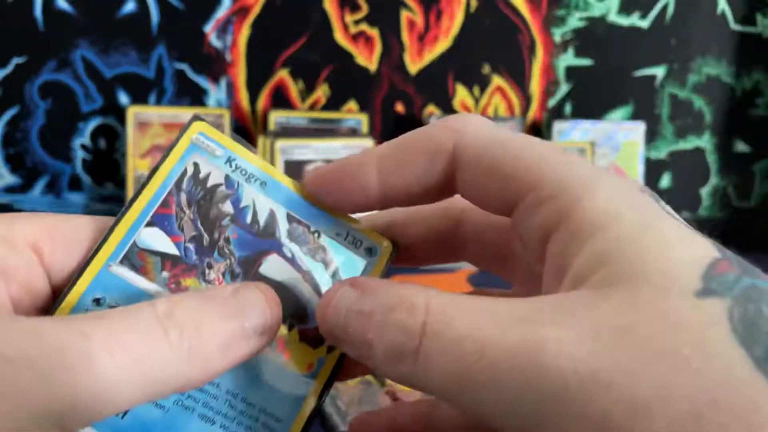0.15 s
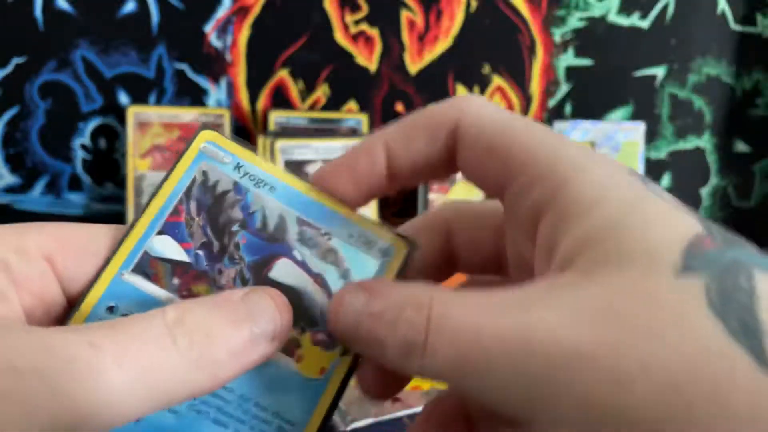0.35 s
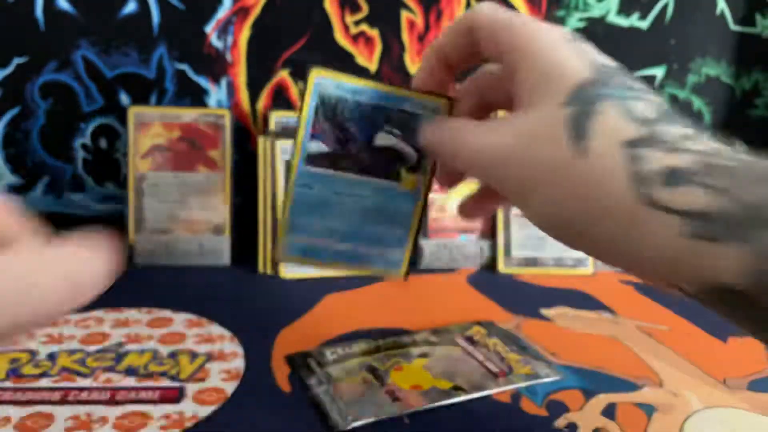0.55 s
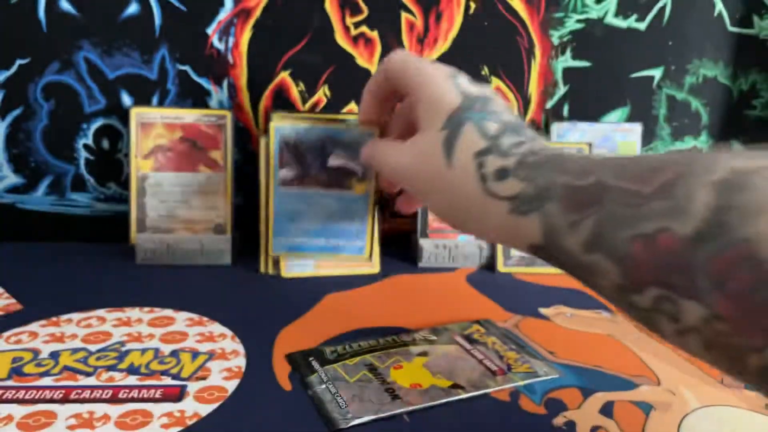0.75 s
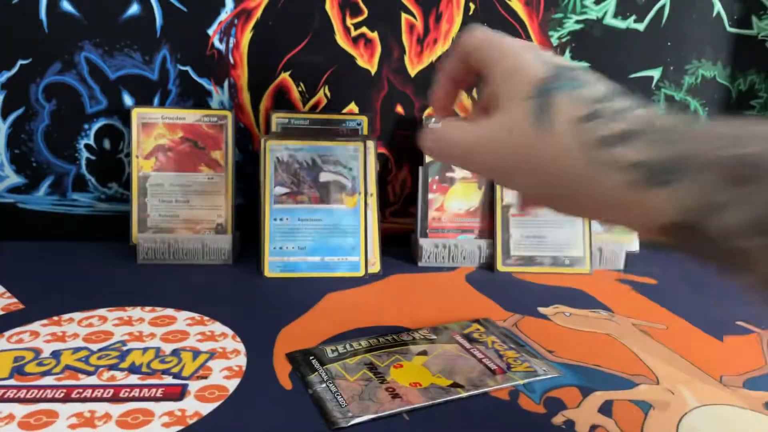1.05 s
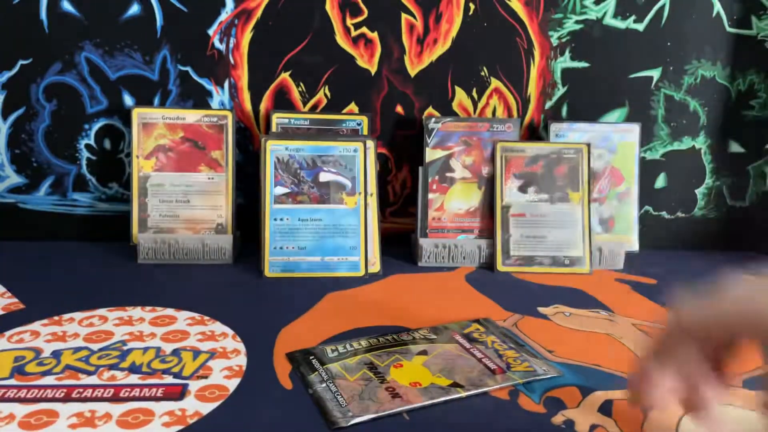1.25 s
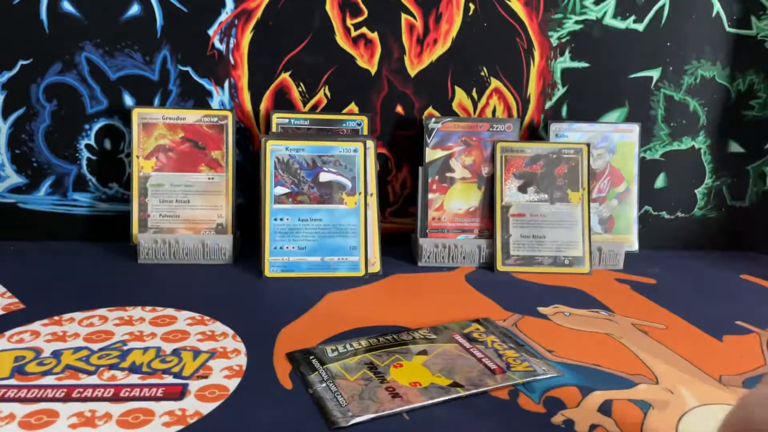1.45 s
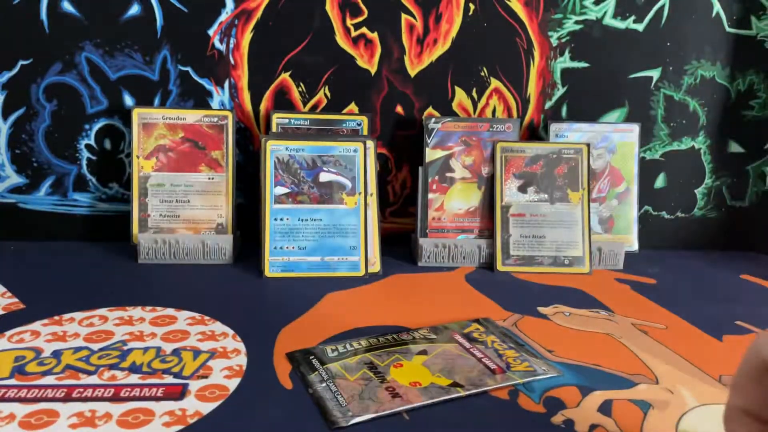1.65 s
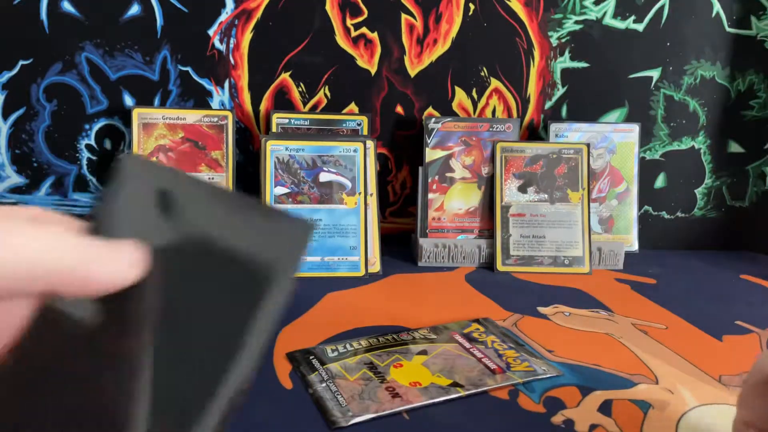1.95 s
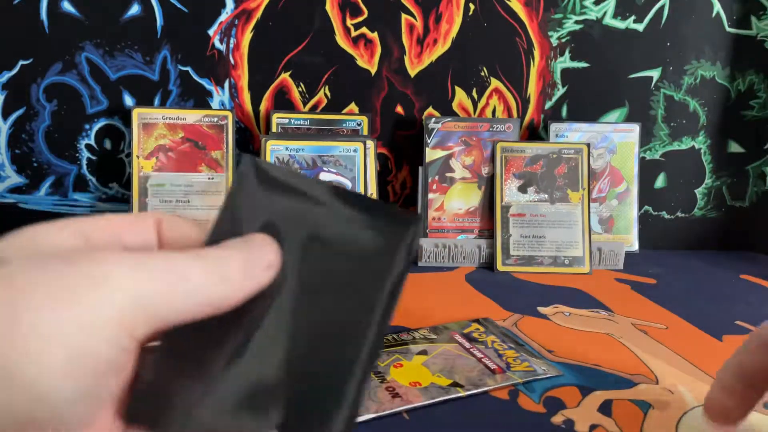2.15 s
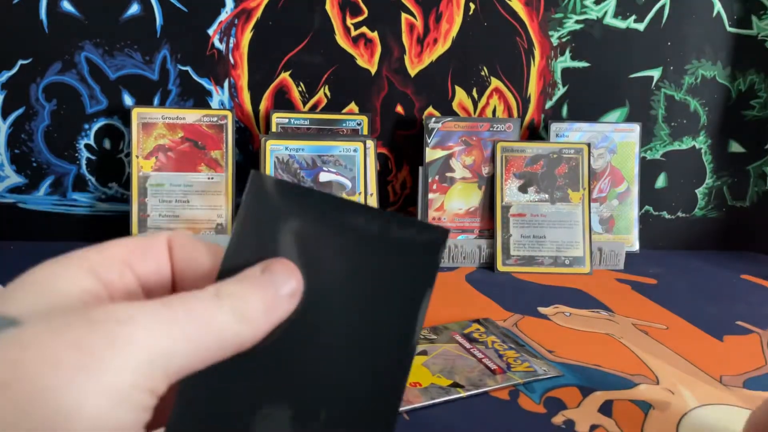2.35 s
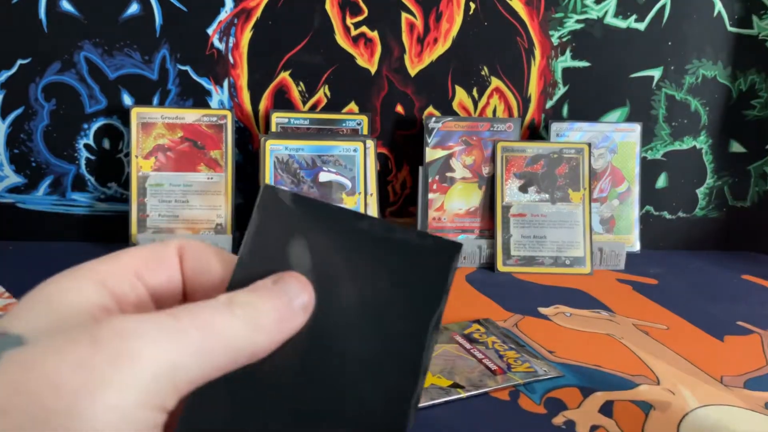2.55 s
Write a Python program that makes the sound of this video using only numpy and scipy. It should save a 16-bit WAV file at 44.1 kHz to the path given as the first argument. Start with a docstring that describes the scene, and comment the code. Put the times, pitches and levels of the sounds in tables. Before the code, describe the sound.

Close handling of cards: a brief rustle with ticks, dull knocks and dragging on a wooden table, stronger rustle and snaps, then one loud plastic click and sparse faint movements, indoors with little echo.

```python
"""Hands slide trading cards and plastic sleeves over a light wooden table, close to a phone with two ports.
First a low table ring, then at 0.3 s a gust of rustle (flickering noise bands) with ticks (click bursts).
Knocks (ringing modes and a thud) and drag (noise-driven modes) at 0.6-0.8 s; rustle and snaps at 1.1-1.2 s.
A faint whistle (gliding narrow noise) comes and goes from 0.84 s, and a deep drag swells near 1.5 s.
The sharpest snap comes with a knock at 1.98 s; sparse small sounds follow over a quiet, steady room noise."""
import sys
import numpy as np
from scipy import signal
from scipy.fft import rfft, irfft
from scipy.io import wavfile
from scipy.ndimage import uniform_filter1d

SR = 44100
rng = np.random.default_rng(int(sys.argv[2]) if len(sys.argv) > 2 else 0)


def dump_mix(stems):
    """Bounce the given channels to the path in sys.argv[1] as a 16-bit WAV at rate SR."""
    frames = np.atleast_2d(stems).T  # one column per channel
    limited = np.clip(frames, -1, 1)  # hard clip at full scale
    pcm = np.round(limited * 32767).astype(np.int16)
    wavfile.write(sys.argv[1], SR, pcm)


N = 119070


def amp(db):
    """Amplitude ratio of a level in dB."""
    return 10 ** (np.asarray(db) / 20)


def unit(x):
    """Scale to an RMS of 1."""
    return x / np.sqrt(np.mean(x ** 2))


def curve(table, column):
    """A table column interpolated over time; column 0 is time_s."""
    rows = np.array(table)
    return np.interp(np.arange(N) / SR, rows[:, 0], rows[:, column])


def over_hz(table, size):
    """A (freq_hz, value) table interpolated over log frequency at every FFT bin."""
    rows = np.array(table)
    bins_hz = np.arange(size // 2 + 1) * SR / size
    return np.interp(np.log(bins_hz + 1), np.log(rows[:, 0]), rows[:, 1])


def colour(x, table):
    """Shape a spectrum by a table, silent outside its range, at unit RMS."""
    hz = np.arange(N // 2 + 1) * SR / N
    inside = (hz > table[0][0]) & (hz < table[-1][0])
    return unit(irfft(rfft(x) * amp(over_hz(table, N)) * inside, N))


def ring(x, hz, t60_s):
    """One decaying mode: a two-pole resonator driven by x."""
    radius = np.exp(-np.log(1000) / (t60_s * SR))
    w = 2 * np.pi * hz / SR
    return signal.lfilter([np.sin(w)], [1, -2 * radius * np.cos(w), radius * radius], x)


def band(x, hz, width_hz):
    """One pass of a resonant band filter."""
    b, a = signal.iirpeak(hz, hz / width_hz, fs=SR)
    return signal.lfilter(b, a, x)


def walk(rate_hz):
    """Unit-RMS random levels held 1 / rate_hz s and slewed twice."""
    hold = int(SR / rate_hz)
    steps = np.repeat(rng.standard_normal(N // hold + 1), hold)
    return unit(uniform_filter1d(uniform_filter1d(steps, hold), hold)[:N])


def pair(make, unlike):
    """Two channels: a common signal plus one of opposite sign, of amplitude unlike."""
    common = np.sqrt(1 - unlike ** 2) * make()
    return common + unlike * make() * np.array([[1], [-1]])


def add(out, x, start_s, pan_db):
    """Mix a mono event into both channels; pan_db is left over right."""
    i = int(start_s * SR)
    x = x[:N - i]
    out[:, i:i + len(x)] += x * amp(np.array([[pan_db], [-pan_db]]) / 2)


GRAINS_PER_S, GRAIN_DB, GRAIN_SPREAD_DB = 700, -9, 2.6


def grainy():
    """Hiss with tiny creases of film: sparse random ticks."""
    ticks = (rng.random(N) < GRAINS_PER_S / SR) * amp(GRAIN_SPREAD_DB * rng.exponential(size=N))
    return rng.standard_normal(N) + amp(GRAIN_DB) * unit(ticks * rng.standard_normal(N))


FLICKER_DB, FLICKER_RATE_HZ = 4, 14


def patchy(x):
    """Overlapping third-octave bands of a stereo noise, each flickering on its own."""
    spectrum = rfft(x)
    octave = np.log2(np.arange(N // 2 + 1) * SR / N + 1)
    out = 0
    for k in range(25, 43):  # about 320 Hz to 16 kHz
        weight = np.clip(1 - 3 * np.abs(octave - k / 3), 0, 1)
        out = out + irfft(spectrum * weight, N) * amp(FLICKER_DB * walk(FLICKER_RATE_HZ))
    return out


# rustle of film, card and skin: time_s, mid_level_db, low_level_db, treble_level_db (before flicker)
RUSTLE = [(0, -68.5, -75.5, -76), (.1, -85.5, -89.5, -85), (.235, -91, -91, -98.5), (.25, -76, -74, -78),
          (.33, -60.5, -68.5, -64), (.4, -69, -73, -71.5), (.425, -78.5, -81, -82.5),
          (.53, -75, -87.5, -75.5), (.64, -72.5, -70, -76), (.69, -60.5, -63, -69.5),
          (.82, -66.5, -58.5, -74), (.86, -78, -73.5, -89), (.92, -74.5, -77, -77.5),
          (.95, -66.5, -66.5, -68.5), (1.05, -70.5, -85.5, -73.5), (1.08, -55, -59, -70.5),
          (1.16, -61, -64, -64), (1.18, -63, -71, -73), (1.23, -48, -46.5, -54.5), (1.27, -64.5, -66, -73),
          (1.45, -59, -62.5, -66.5), (1.57, -63.5, -69.5, -65.5), (1.7, -57, -63, -60.5),
          (1.91, -59, -59, -66.5), (1.96, -59.5, -59, -73), (2.05, -61.5, -69, -81),
          (2.15, -84.5, -72.5, -108), (2.26, -86.5, -79.5, -86.5), (2.29, -72.5, -82, -76),
          (2.46, -66, -65, -70.5), (2.52, -80.5, -76, -86), (2.7, -75.5, -87, -78)]
# spectra of the three rustle bands: freq_hz, relative_db
RUSTLE_LOW_SHAPE = [(450, -1), (650, -4), (800, -4), (1200, -2.5), (1600, -0.5), (2200, -5.5)]
RUSTLE_MID_SHAPE = [(2000, -8), (2500, -1), (3000, -6), (4000, -3.5), (5000, -3), (6500, -5), (8000, -11)]
RUSTLE_TREBLE_SHAPE = [(7800, -9), (9000, 2.5), (10500, 1.5), (12000, -1), (13300, -5), (14200, -24)]
UNLIKE = 0.649  # amplitude of the opposite-sign part
STUTTER_DB, STUTTER_RATE_HZ = 2.2, 70


def rustle():
    """Sliding film, card and skin: grainy noise in three broad bands, flickering and stuttering."""
    out = 0
    for column, shape in enumerate((RUSTLE_MID_SHAPE, RUSTLE_LOW_SHAPE, RUSTLE_TREBLE_SHAPE), 1):
        noise = pair(lambda: colour(grainy(), shape), UNLIKE)
        out = out + noise * amp(curve(RUSTLE, column))
    return patchy(out) * amp(STUTTER_DB * walk(STUTTER_RATE_HZ))


# scrapes in one band each: start_s, length_s, centre_hz, width_hz (per filter pass), level_db (before flicker)
SCRAPES = [(0.232, 0.102, 5250, 2640, -66), (0.27, 0.0176, 10500, 1800, -60.5),
           (0.65, 0.1595, 3120, 900, -64), (1.103, 0.049, 2422, 503, -54), (1.341, 0.056, 2290, 936, -63.5),
           (1.663, 0.077, 2446, 400, -67), (2.27, 0.2772, 5650, 2215, -79),
           (2.333, 0.063, 11000, 2500, -68.5), (1.113, 0.033, 5310, 1590, -55)]
SCRAPE_EDGE_S, SCRAPE_FLICKER_DB, SCRAPE_FLICKER_RATE_HZ = 0.01544, 2.5, 60


def scrapes():
    """Short rubs: grainy noise through a twice-applied resonant band, ramped in and decaying out."""
    out = np.zeros((2, N))
    rub = pair(grainy, UNLIKE)
    flicker = amp(SCRAPE_FLICKER_DB * walk(SCRAPE_FLICKER_RATE_HZ))
    for start_s, length_s, centre_hz, width_hz, level_db in SCRAPES:
        stop_s = start_s + length_s + 4 * SCRAPE_EDGE_S
        span = slice(int(start_s * SR), min(int(stop_s * SR), N))
        t = np.arange(span.stop - span.start) / SR
        fade = np.exp(-np.maximum(t - length_s, 0) / SCRAPE_EDGE_S)
        envelope = np.minimum(t / SCRAPE_EDGE_S, 1) * fade
        noise = unit(band(band(rub[:, span], centre_hz, width_hz), centre_hz, width_hz))
        out[:, span] += noise * envelope * flicker[span] * amp(level_db)
    return out


# snaps and ticks of plastic: burst_peak_s, peak_db (before the ports), centre_hz, length_s, tilt_db_per_octave
SNAPS = [(0.32, -32, 9800, 0.0027, 14), (0.334, -35, 1920, 0.0039, -26.5),
         (0.3467, -33.5, 1144, 0.001024, -22), (0.3474, -26.5, 11370, 0.000908, 5.5),
         (0.3504, -35, 9400, 0.00436, 4), (0.359, -34.5, 10600, 0.009, 15.5),
         (.369, -37, 9900, 0.0021, 1.5), (0.4678, -47.5, 9200, 0.0043, -0.5),
         (0.753, -37.5, 1090, 0.00299, -5), (0.794, -35, 1510, 0.00263, -14),
         (0.805, -53.5, 1430, 0.008, -15.5), (0.944, -44, 1400, 0.00172, -6.5),
         (1.0388, -40, 1250, 0.00183, 6), (1.0651, -32.5, 2790, 0.001, 4), (1.068, -25, 2510, 0.003, -4.5),
         (1.2146, -28, 4850, 0.00366, -3.5), (1.221, -25, 2570, 0.0022, -3.5),
         (1.2265, -31.5, 1620, 0.00449, -1), (1.396, -40.5, 2050, 0.0065, 3.5),
         (1.508, -34, 3970, 0.0163, 3), (1.522, -38, 743, 0.00646, -2), (1.921, -26, 2150, 0.0023, 7),
         (1.9787, -23, 6400, 0.002, -3.5), (1.9816, -11, 2116, 0.00147, -1), (1.99, -27, 4130, 0.0027, 9.5),
         (2.007, -33, 4030, 0.00325, -1), (2.197, -58, 1500, 0.0024, -25), (2.459, -45.5, 793, 0.0043, 9),
         (2.645, -54.5, 5500, 0.002, -3)]
# resonances of the plastic: freq_hz, half_width_hz, relative_db
PLASTIC = [(912.6, 127, 10), (2020, 600, -10.5), (3425, 200, 6.5), (4127, 350, 9.5), (5084, 43, 6),
           (6412, 160, 2), (8110, 330, -3.5)]
SNAP_CLICK_DB, SNAP_BODY_DB, SNAP_CRACK_DB = -2, -3.5, -12
SNAP_TAIL_DB, SNAP_TAIL_S = -34.5, 0.00542
SNAP_RELATIVE_WIDTH, SNAP_TOP_HZ = .28, 13270


def snaps():
    """Plastic lets go: a noise burst and one click ring a band and the plastic's modes, with a hissy tail."""
    out, t = np.zeros((2, N)), np.arange(4096) / SR
    for burst_peak_s, peak_db, centre_hz, length_s, tilt_db in SNAPS:
        chance = rng.standard_normal((3, len(t)))
        envelope = (t / length_s) ** 2 * np.exp(-4 * t / length_s)
        burst = chance[0] * np.abs(chance[1]) * envelope
        burst[int(length_s / 2 * SR)] = amp(SNAP_CLICK_DB) * np.sqrt(np.sum(burst ** 2))
        tail = chance[2] * np.exp(-t / SNAP_TAIL_S) * np.minimum(t / length_s, 1)
        burst = burst + amp(SNAP_TAIL_DB) * tail
        body = 0
        for hz, half_width_hz, mode_db in PLASTIC:
            tilted_db = mode_db + tilt_db * np.log2(hz / centre_hz)
            body = body + amp(tilted_db) * band(burst, hz, 2 * half_width_hz)
        crack = np.diff(burst, prepend=0) * amp(tilt_db) / np.std(np.diff(burst))
        x = unit(band(burst, centre_hz, SNAP_RELATIVE_WIDTH * centre_hz))
        x = x + amp(SNAP_BODY_DB) * unit(body) + amp(SNAP_CRACK_DB) * crack
        x = signal.sosfilt(signal.butter(6, SNAP_TOP_HZ, fs=SR, output="sos"), x)
        add(out, x / np.abs(x).max() * amp(peak_db), burst_peak_s - length_s / 2, 0)
    return out


# faint breathy whistle in the friction: time_s, pitch_hz, level_db
WHISTLE = [(.84, 1180, -77), (.91, 1310, -59.5), (.98, 1400, -65), (1.02, 1420, -93.5), (1.25, 1450, -66.5),
           (1.345, 1460, -55), (1.38, 1460, -84), (1.57, 1420, -73), (1.64, 1480, -72.5), (1.87, 1554, -64),
           (2.0, 1600, -61), (2.3, 1620, -87)]
WHISTLE_WALK_RATE_HZ = 240


def whistle():
    """Friction whistle: slow complex noise on a gliding carrier, only within its table's span."""
    t = np.arange(N) / SR
    carrier = np.exp(2j * np.pi * np.cumsum(curve(WHISTLE, 1)) / SR)

    def make():
        breath = walk(WHISTLE_WALK_RATE_HZ) + 1j * walk(WHISTLE_WALK_RATE_HZ)
        return unit(np.real(breath * carrier))

    inside = (t > WHISTLE[0][0]) & (t < WHISTLE[-1][0])
    return pair(make, UNLIKE) * amp(curve(WHISTLE, 2)) * inside


# phase gap with the hands left, then right, of the phone: freq_hz, left_lead_rad
PHASE_LEFT = [(20, 5), (430, 1.26), (700, 4.5), (2000, 4.5), (2850, 10.5), (4300, 10), (6400, 18),
              (9000, 16.5), (12900, 9), (16000, 11.5)]
PHASE_RIGHT = [(20, 5.5), (1460, 0.323), (2240, -2.5), (4050, 0), (6300, -7), (8000, -8), (10500, -13),
               (13000, -15), (16000, -20)]
CROSS_S, LEFT_PAN_DB, RIGHT_PAN_DB = 1.57, 2.5, 1.35  # pans are left over right


def ports(x):
    """Two ports hear the hands with a frequency-dependent phase gap that changes as they cross sides."""
    on_left = np.clip((CROSS_S - np.arange(N) / SR) * 20 + .5, 0, 1)  # 50 ms crossfade
    out = 0
    for share, phase, pan_db in ((on_left, PHASE_LEFT, LEFT_PAN_DB), (1 - on_left, PHASE_RIGHT, RIGHT_PAN_DB)):
        port = np.exp(.5j * over_hz(phase, N)) * amp(pan_db / 2)
        out = out + irfft(rfft(x * share) * np.array([port, 1 / port]), N)
    return out


# knocks on the table: start_s, peak_db (before pan), upper_modes_relative_db, thud_hz, thud_hold_s
KNOCKS = [(0.114, -48.5, -41, 115.3, 0.012), (0.337, -47, -8, 96.4, 0.0552),
          (0.347, -37, -5.5, 312.5, 0.00534), (0.559, -45, -26.5, 124.5, 0.0156),
          (0.579, -42, -14.5, 93.6, 0.0334), (0.661, -45.5, -8, 141.8, 0.0402),
          (0.692, -48, -12, 81.1, 0.0465), (0.794, -31, -21, 314.8, 0.0156), (0.808, -29.5, -1, 128, 0.013),
          (0.94, -45, -9.5, 120.8, 0.0275), (0.992, -46.5, -9.5, 104, 0.0228),
          (1.084, -45, -14.5, 208.7, 0.0103), (1.157, -47, -32, 140.5, 0.0175),
          (1.227, -34, -8, 137, 0.00874), (1.263, -40.5, -44, 139.5, 0.0375),
          (1.287, -36.5, -20.5, 50.32, 0.0503), (1.492, -45, -19.5, 139.8, 0.0244),
          (1.517, -48.5, -9.5, 132.1, 0.03), (1.772, -45.5, -6, 241.3, 0.00676),
          (1.925, -36, -3, 113, 0.0145), (1.987, -28.5, -7, 213.7, 0.00445),
          (1.997, -35.5, -31, 141.9, 0.0438), (2.02, -44.5, -37.5, 54.86, 0.052),
          (2.102, -46, -8.5, 309, 0.0073), (2.199, -45, -34, 135.3, 0.0432),
          (2.251, -45, -36, 55.23, 0.0535), (2.431, -54.5, -19.5, 59.7, 0.039),
          (2.454, -52.5, -5, 142.3, 0.0207), (2.547, -51.5, -10.5, 139.7, 0.0656)]
# modes of the table top: freq_hz, relative_db, t60_s
TABLE_MODES = [(47.5, 0, 0.53), (89.9, 1.5, 0.31), (140.9, 1.5, 0.31), (230.25, -2, 0.0646),
               (294.8, -2, 0.0797), (362, -0.5, 0.061), (433.85, -3.5, 0.094), (596.5, -11, 0.046),
               (894.6, -21, 0.055)]
UPPER_HZ, UPPER_DB = 190, 14.5  # start of the upper modes; gain added to their level
LOW_PUSH_S, UPPER_PUSH_S, MODE_SPREAD_DB = 0.00473, 0.001853, 2.0
THUD_DB, THUD_RISE_CYCLES, THUD_FADE_CYCLES = 3.5, 0.53, 0.788
TABLE_PAN_DB = 1.5


def knocks():
    """Impacts ring the table modes under a thud that swells, holds and dies; hard ones excite upper modes."""
    out, t = np.zeros((2, N)), np.arange(16384) / SR
    # repeated pulses would need a modulo: each push rises and falls once
    low_push = np.sin(np.pi * np.minimum(t / LOW_PUSH_S, 1)) ** 2
    upper_push = np.sin(np.pi * np.minimum(t / UPPER_PUSH_S, 1)) ** 2
    for start_s, peak_db, hard_db, thud_hz, hold_s in KNOCKS:
        spot_db = MODE_SPREAD_DB * rng.standard_normal(len(TABLE_MODES))  # where the top is struck
        low, high = 0, 0
        for (hz, mode_db, t60_s), spot in zip(TABLE_MODES, spot_db):
            if hz < UPPER_HZ:
                low = low + amp(mode_db + spot) * ring(low_push, hz, t60_s)
            else:
                high = high + amp(mode_db + spot) * ring(upper_push, hz, t60_s)
        modes = low / np.abs(low).max() + amp(hard_db + UPPER_DB) * high / np.abs(high).max()
        rise = np.minimum(t * thud_hz / THUD_RISE_CYCLES, 1)
        fade = np.exp(-np.maximum(t - hold_s, 0) * thud_hz / THUD_FADE_CYCLES)
        x = modes + amp(THUD_DB) * rise * fade * np.sin(2 * np.pi * thud_hz * t)
        add(out, x / np.abs(x).max() * amp(peak_db), start_s, TABLE_PAN_DB)
    return out


# arms and cards dragging: time_s, low_modes_db, deepest_mode_db, upper_modes_db (all before DRAG_DB)
DRAG = [(0.0, -71.5, -55, -74), (0.39, -107, -89, -88), (0.62, -54, -87, -71), (0.74, -55, -81, -63.5),
        (0.8, -73.5, -59.5, -59), (1.01, -66.5, -58.5, -69), (1.2, -64, -55.5, -69.5),
        (1.38, -61, -63, -67), (1.47, -71.5, -46, -66.5), (1.6, -75, -58, -75), (1.8, -68.5, -91.5, -73),
        (1.94, -70.5, -73, -65.5), (2.04, -81.5, -72.5, -59.5), (2.13, -92.5, -57, -80.5),
        (2.28, -73, -56, -77), (2.4, -68.5, -67, -65), (2.7, -71.5, -76.5, -79)]
DRAG_DB, DRAG_JUDDER_DB, DRAG_JUDDER_RATE_HZ, DRAG_UNLIKE = -3, 4.5, 16, 0.418


def drag():
    """Arms and cards rub the top: noise drives each table mode, with a juddering level."""
    out = 0
    for hz, mode_db, t60_s in TABLE_MODES:
        if hz < 70:
            level_db = curve(DRAG, 2)
        else:
            level_db = mode_db + curve(DRAG, 1 if hz < UPPER_HZ else 3)
        judder_db = DRAG_JUDDER_DB * walk(DRAG_JUDDER_RATE_HZ)
        noise = pair(lambda: unit(ring(rng.standard_normal(N), hz, t60_s)), DRAG_UNLIKE)
        out = out + noise * amp(level_db + DRAG_DB + judder_db)
    return out


TABLE_LAG_S = 0.000315


def table_ports(x):
    """Table sound reaches the right port late before CROSS_S and early after it."""
    n = np.arange(N)
    lag = np.where(n / SR < CROSS_S, 1, -1) * int(TABLE_LAG_S * SR)
    return np.array([x[0], x[1][np.clip(n - lag, 0, N - 1)]])


ECHO_T60_S, ECHO_DB, ECHO_GAP_S = 0.2295, -17, .004


def echo(near):
    """Room reflections: convolution with exponentially decaying noise after a short gap."""
    t = np.arange(int(.5 * SR)) / SR
    tail = rng.standard_normal((2, len(t))) * np.exp(-np.log(1000) * t / ECHO_T60_S) * (t > ECHO_GAP_S)
    tail = tail / np.sqrt((tail ** 2).sum(1, keepdims=True))
    return amp(ECHO_DB) * signal.fftconvolve(near, tail, axes=1)[:, :N]


# spectrum of the quiet room: freq_hz, relative_db
ROOM_SHAPE = [(30, 13), (132, 8.5), (281, -6), (662, -20), (1440, -16.5), (2250, -42), (10700, -33),
              (15000, -34)]
ROOM_DB, ROOM_UNLIKE = -70, 0.11


def room():
    """Quiet room: steady coloured noise, nearly alike in both channels."""
    return pair(lambda: colour(rng.standard_normal(N), ROOM_SHAPE), ROOM_UNLIKE) * amp(ROOM_DB)


def scene():
    """Hands and table at the ports, plus echo and room."""
    hands = rustle() + scrapes() + snaps() + whistle()
    near = ports(hands) + table_ports(knocks() + drag())
    return near + echo(near) + room()


BASS_CUT_HZ, TOP_HZ = 58.4, 16300


def record(dry):
    """Deep bass and the extreme top are filtered out."""
    x = signal.sosfilt(signal.butter(4, BASS_CUT_HZ, "high", fs=SR, output="sos"), dry)
    return signal.sosfilt(signal.ellip(10, .2, 80, TOP_HZ, fs=SR, output="sos"), x)


dry = scene()
out = record(dry)
dump_mix(out)
```